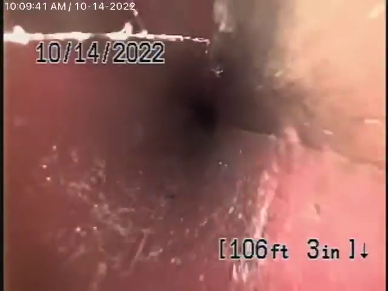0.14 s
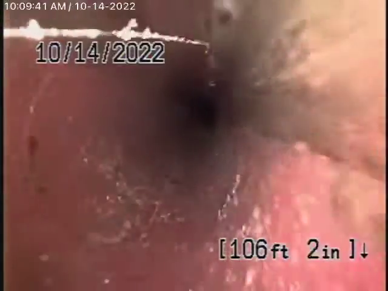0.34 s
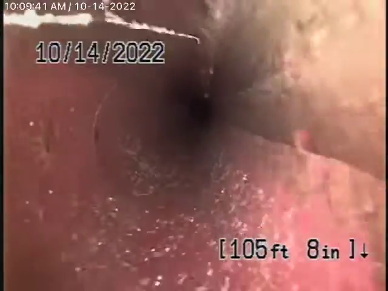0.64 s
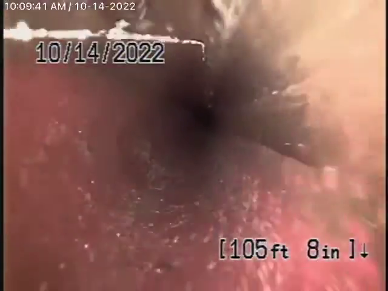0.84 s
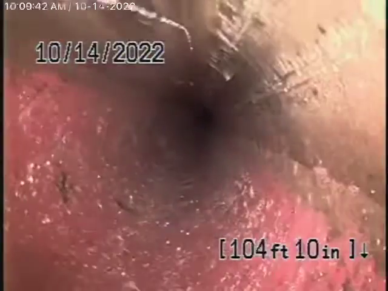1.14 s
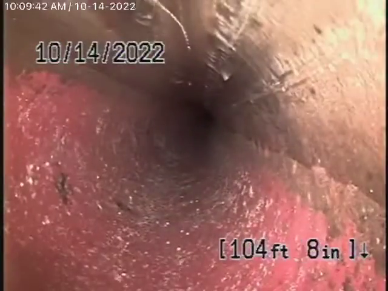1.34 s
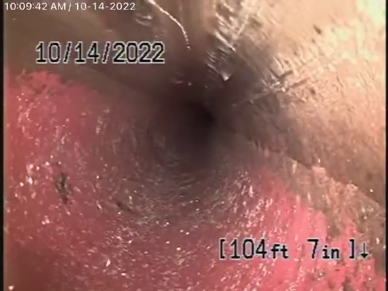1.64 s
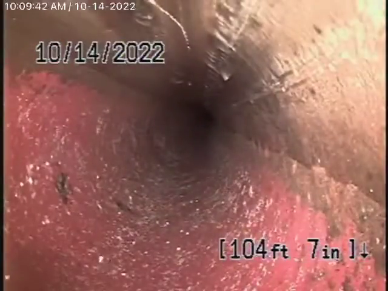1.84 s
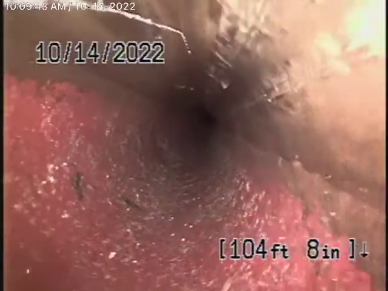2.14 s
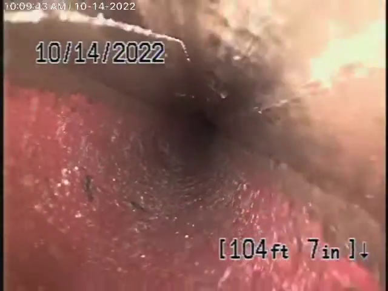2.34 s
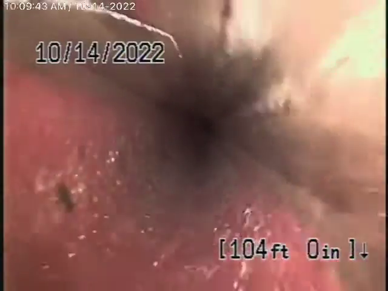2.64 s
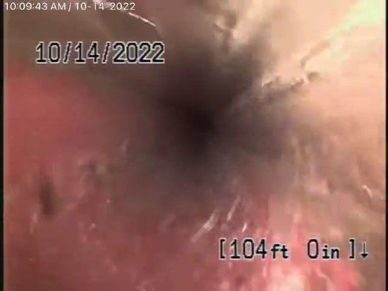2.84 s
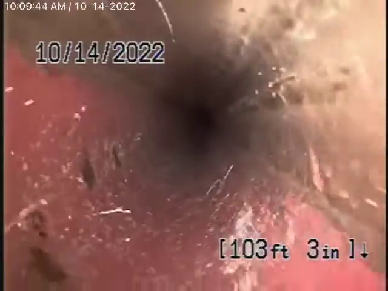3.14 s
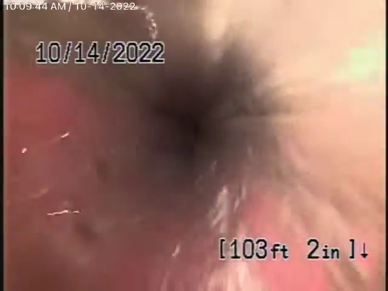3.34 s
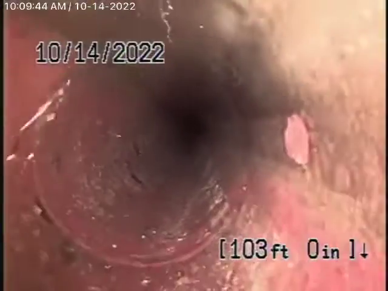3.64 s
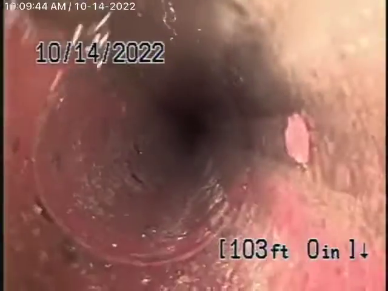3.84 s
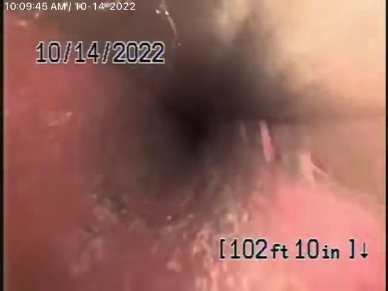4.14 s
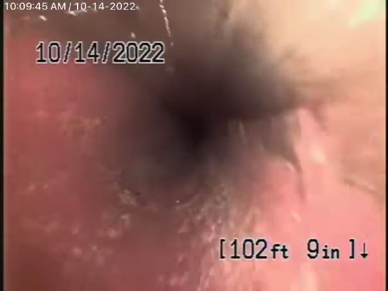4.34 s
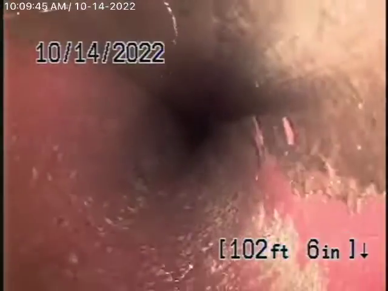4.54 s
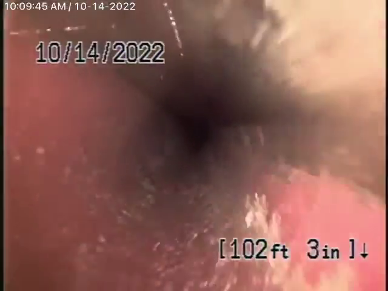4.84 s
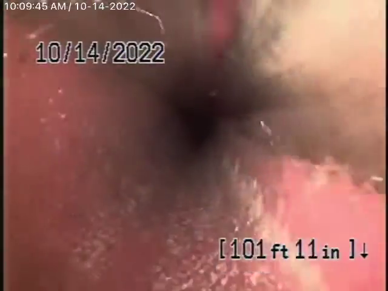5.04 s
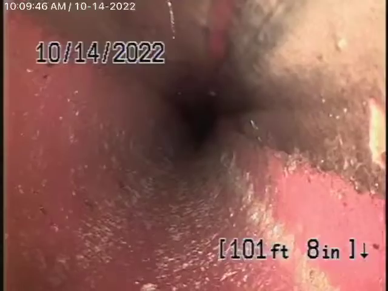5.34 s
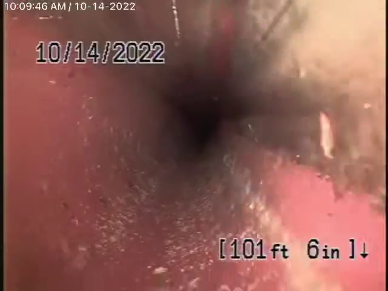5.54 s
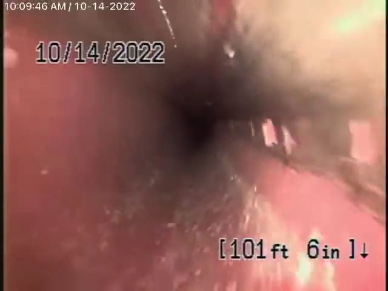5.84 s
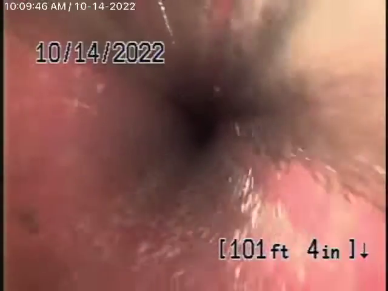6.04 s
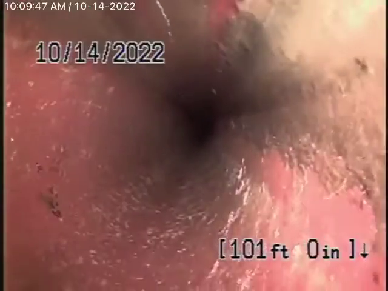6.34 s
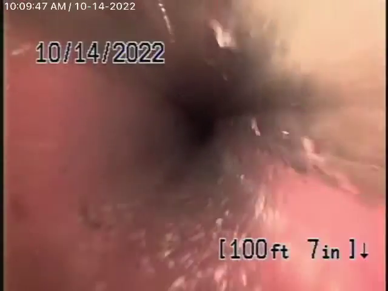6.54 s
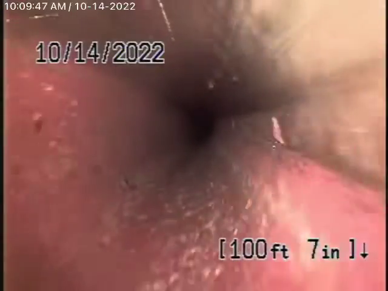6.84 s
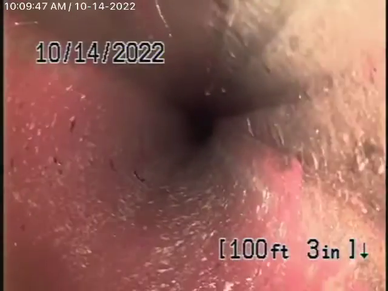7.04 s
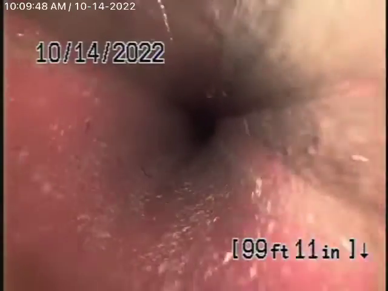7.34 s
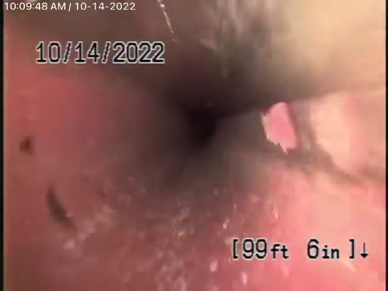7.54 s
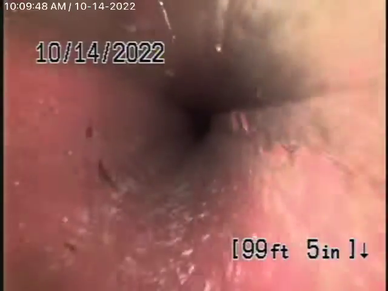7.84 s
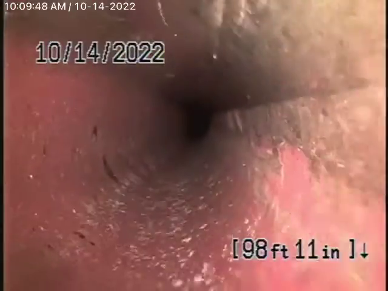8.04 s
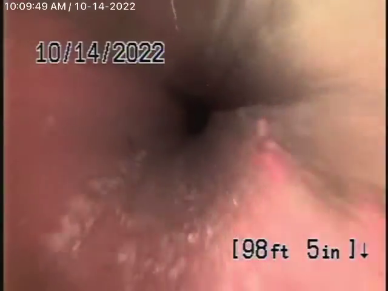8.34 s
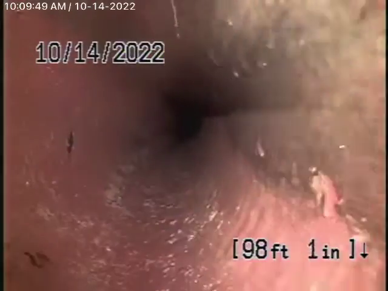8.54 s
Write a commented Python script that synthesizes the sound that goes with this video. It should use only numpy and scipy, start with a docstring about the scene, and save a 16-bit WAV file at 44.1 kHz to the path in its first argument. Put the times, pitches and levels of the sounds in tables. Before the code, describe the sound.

A stiff camera cable is pulled from a pipe and wound onto a steel reel in a small room, heard through a close, treble-limited microphone with faint hiss. A low wavering hum and dull rumble run throughout. Rubbing starts moderate, with dry clicks around 0.6 and a clank with ticks at 0.8 to 1 second, then eases from 1.3 to 2. It swells with a thin, fluttering whistle around 2.7 and again near 3.2. A strong metallic knock rings at 3.3, with lighter contacts near 3.9. A sharp tick at 4.7 precedes the loudest clank at 4.9. The rubbing dips around 5.5, a duller knock lands at 5.6, then the pull picks up near 6.3 with a crisp tick. Softer knocks follow at 6.6 and 7.4, dry ticks at 8, and rubbing continues to the end at about 8.7.

```python
"""Inspection cable wound onto its reel

The push cable of an inspection camera is pulled back out of a buried pipe and fed onto its reel.
The turning reel hums and rumbles as filtered noise and wavering low tones; the cable rubs, whistles
and crackles as bands of noise. Ticks in the guide and dry pops are short, fading rings.
Now and then a stiff coil slips and knocks against the steel cage, in a small room: fading sine tones
give the ring and bands of fading noise give the clatter.
"""
import sys
import numpy as np
from scipy import signal
from scipy.fft import rfft, irfft, next_fast_len
from scipy.io import wavfile

SR = 44100
rng = np.random.default_rng(int(sys.argv[2]) if len(sys.argv) > 2 else 0)


def int16_out(signal):
    """Quantize to a 16-bit WAV file."""
    q = np.round(np.clip(np.atleast_2d(signal).T, -1, 1) * 32767)
    wavfile.write(sys.argv[1], SR, q.astype(np.int16))


N = 382788
TIME = np.arange(N) / SR
AGE = TIME[:SR]  # time since a contact, up to one second

# Coil knocks against the cage: (time [s], force [dB], weight of the coil as bass boost [dB],
# hardness of the contact [dB per octave], pitch favoured by the spot struck [Hz],
# relative level of that pitch [dB])
KNOCKS = [(0.004, -39.5, -0.5, -6, 507, -34), (0.864, -27.5, 2.5, -0.4, 1624, -27),
          (3.14, -37.5, 1, -6.5, 340.6, -30.5), (3.146, -49, 9, 5.5, 149, -33.5),
          (3.333, -21.5, -2.5, -1.43, 782, -21), (3.372, -42.5, -13, 2.5, 1844, -24),
          (3.803, -57.5, 6, 4.5, 1400, -50), (3.877, -41.5, 3.5, -1.4, 1150, -43),
          (3.936, -49, 13.5, -0.5, 179, -36), (4.355, -59, 4, 3, 208.5, -34.5),
          (4.933, -35.5, -26, 4, 2970, -21), (4.938, -15.5, -10.5, -1.65, 547, -18.5),
          (4.985, -42.5, 12.5, -5, 134.5, -34.5), (5.286, -51.5, 4.5, -2.5, 496, -49),
          (5.619, -28.5, -14, -12, 1012, -32.5), (5.626, -38, 6, -0.6, 184.6, -35),
          (6.632, -41.5, -6.5, -5.5, 670, -47), (6.672, -37.5, -5, -4, 510, -38),
          (6.929, -55, 11, -8, 176, -36.5), (7.444, -30, -8.5, -5.5, 666, -22),
          (7.61, -63.5, 23.5, -15, 184, -42), (8.491, -56.5, 3, 1, 1430, -60)]

USUAL_PULL_DB = -54  # pull at which rolling and rumble have their usual levels


def from_db(db):
    """Turn decibels into a gain."""
    return 10 ** (np.asarray(db) / 20)


def rms_one(x):
    """Scale a sound to unit power."""
    return x / np.sqrt(np.mean(x ** 2) + 1e-20)


def at_hz(points, hz):
    """Read a spectrum between its points, on a log-frequency axis."""
    points = np.array(points)
    return np.interp(np.log(hz), np.log(points[:, 0]), points[:, 1])


def fade(age, t60):
    """Die away exponentially, losing 60 dB in t60 seconds."""
    return from_db(-60 * age / t60)


def add(out, start_s, sound):
    """Mix a sound in at its start time, cutting whatever runs past the end."""
    first = max(0, round(start_s * SR))
    out[first:first + len(sound)] += sound[:max(0, N - first)]


def band(x, low_hz, high_hz):
    """Keep only the pitches between two limits."""
    sos = signal.butter(2, [low_hz, high_hz], "band", fs=SR, output="sos")
    return signal.sosfilt(sos, x)


def drift(per_s):
    """Wander between random values, per_s of them each second, joined by straight lines."""
    return np.interp(TIME * per_s, np.arange(4096), rng.standard_normal(4096))


def noise(spectrum, peaks=()):
    """Make unit-power noise with a smooth spectrum and resonances standing out of it."""
    size = next_fast_len(N)
    hz = np.maximum(np.fft.rfftfreq(size, 1 / SR), 1)
    lift = 1  # in power
    for peak_hz, width_hz, db in peaks:
        lift = lift + (from_db(db) ** 2 - 1) / (1 + (2 * (hz - peak_hz) / width_hz) ** 2)
    gain = from_db(at_hz(spectrum, hz)) * np.sqrt(np.abs(lift))
    white = rng.standard_normal(size)
    return rms_one(irfft(rfft(white) * gain, size)[:N])


def hiss(level_db):
    """The microphone's steady hiss is noise with a fixed spectrum."""
    # Relative spectrum of the hiss: (pitch [Hz], level [dB per Hz])
    hiss_spectrum = [(100, -13.5), (500, 14), (1500, 9.5), (3500, -3), (7000, -22)]
    return from_db(level_db) * noise(hiss_spectrum)


def pull_effort():
    """The effort of the pull rises and falls along straight lines between set points."""
    # Effort, as the level of the rubbing before its own adjustments: (time [s], level [dB])
    effort_points = [(0, -52.5), (0.55, -53.5), (1.02, -50.5), (1.3, -58.4), (2.05, -57.5), (2.72, -48),
                     (2.92, -54), (3.22, -48), (3.62, -54.5), (4.1, -51), (4.55, -53.5), (4.8, -50.5),
                     (5.15, -52), (5.47, -58), (6.3, -51.0), (6.8, -55), (7.35, -52), (8.68, -55)]
    s, level_db = np.transpose(effort_points)
    return np.interp(TIME, s, level_db)


def rumble(pull_db, usual_db, follows):
    """A dull rumble takes a share of the pull's swing and wanders in level."""
    # Relative smooth spectrum: (pitch [Hz], level [dB per Hz])
    rumble_spectrum = [(20, -7), (33, -25), (48, 8.5), (80, -2), (100, -1.5), (140, -3.5), (250, -26.5),
                       (600, -59)]
    # Resonances that the motion keeps excited: (pitch [Hz], width [Hz], boost [dB])
    rumble_peaks = [(71.4, 6.6, 12), (114, 22, 15)]
    level_db = usual_db + follows * (pull_db - USUAL_PULL_DB)
    return from_db(level_db + 1.9 * drift(4.4)) * noise(rumble_spectrum, rumble_peaks)


def hum(centre_hz, centre_db):
    """The reel's hum is a low tone that wavers in pitch and level."""
    hz = centre_hz * (1 + 0.0892 * drift(4))
    phase = 2 * np.pi * np.cumsum(hz) / SR
    return from_db(centre_db + 3.7 * drift(9.0)) * np.sin(phase)


def low_swells(waver):
    """Brief low drones swell and die, each wavering by a small share of its pitch."""
    # Drones: (start [s], length [s], middle pitch [Hz], peak level [dB])
    swell_table = [(-.1, 0.65, 114.7, -47.5), (2.153, 0.59, 73, -55), (2.15, .55, 100.9, -54),
                   (2.497, 0.38, 119, -48), (2.7, 0.64, 101, -52), (3.9, 0.51, 82, -51.5),
                   (4.038, 0.54, 211, -52.5), (5.8, 0.3, 76, -51.5)]
    out = np.zeros(N)
    for start, length, hz, db in swell_table:
        progress = np.clip((TIME - start) / length, 0, 1)
        phase = 2 * np.pi * np.cumsum(hz * (1 + waver * drift(5))) / SR
        out += from_db(db) * np.sin(np.pi * progress) * np.sin(phase)
    return out


def grit(per_s, spread_db):
    """Specks of dirt on the cable crackle through the guide, at random moments and sizes."""
    sizes = from_db(spread_db * np.minimum(rng.exponential(1, N), 4))
    signs = rng.choice([-1, 1], N)
    clicks = sizes * signs * (rng.random(N) < per_s / SR)
    scatter = rng.standard_normal(len(AGE)) * fade(AGE, 0.07)
    return rms_one(band(signal.fftconvolve(clicks, scatter)[:N], 2300, 4000))


def turning_reel(pull_db):
    """The pull keeps the cage ringing faintly and the cable rubbing through its guide."""
    # Relative smooth spectra of rolling and rubbing: (pitch [Hz], level [dB per Hz])
    roll_spectrum = [(90, -3.5), (160, -2.5), (260, -11), (400, -10.5), (700, -14), (1100, -20.5),
                     (2000, -22), (4000, -52)]
    rub_spectrum = [(300, -4), (1000, 4.5), (2400, 5.5), (3500, 4), (3900, 3), (4600, 6), (5300, 6.5),
                    (6400, 5.5), (7000, -7.5)]
    # Resonances that the motion keeps excited: (pitch [Hz], width [Hz], boost [dB])
    roll_peaks = [(170, 19, 5.2), (202, 25.6, 13.6), (324.7, 28.6, 13.3), (515, 40, 5.2), (660, 18, 6.1),
                  (851, 110, 8.4)]
    rub_peaks = [(1373, 130, 7.4), (3140, 325, 8)]
    # Lurches of the reel: (time [s], change in rolling [dB], change in rubbing [dB])
    lurch_table = [(.35, 2.5, -3), (2.36, 1, 1), (3.87, 6.5, -0.5), (4.1, 2, 3), (4.8, 5.5, 1.5),
                   (5.3, 2.5, 3), (5.6, 8.5, 0.5), (5.94, 7.5, 3), (7.35, 2.5, 1), (7.62, 4.5, -3.5),
                   (8.35, -1, -3)]
    lurch_s = 0.071  # half length of a lurch

    # Rolling takes 0.48 of the pull's swing; rubbing takes all of it.
    roll_db = -52.5 + 0.48 * (pull_db - USUAL_PULL_DB)
    rub_db = pull_db - 2.14
    for s, roll_change_db, rub_change_db in lurch_table:
        lurch = np.exp(-((TIME - s) / lurch_s) ** 2)
        roll_db = roll_db + roll_change_db * lurch
        rub_db = rub_db + rub_change_db * lurch

    pressure = drift(25)  # the cable bears on the guide unevenly
    roll = from_db(roll_db + 1.35 * pressure) * noise(roll_spectrum, roll_peaks)
    crackle = from_db(-9.5) * grit(per_s=70, spread_db=3.5)
    rub = from_db(rub_db + 1.1 * pressure) * (noise(rub_spectrum, rub_peaks) + crackle)
    return roll + rub


def whistles(flutter_db):
    """Where the cable drags harder in its guide, friction sings in a narrow, fluttering band."""
    # Rough whistles: (start [s], end [s], pitch [Hz], width [Hz], level before flutter [dB])
    whistle_table = [(-.4, .7, 3120, 220, -75), (2.054, 3.1, 3170, 170, -63.5),
                     (2.107, 3.004, 6260, 340, -66.5), (3.749, 4.65, 3160, 190, -68),
                     (5.093, 7.901, 5200, 259, -69), (6.05, 6.546, 1420, 260, -66.5)]
    out = np.zeros(N)
    for start, end, hz, width, db in whistle_table:
        progress = np.clip((TIME - start) / (end - start), 0, 1)
        swell = np.sqrt(np.abs(np.sin(np.pi * progress)))
        tone = rms_one(band(rng.standard_normal(N), hz - width / 2, hz + width / 2))
        waver_s = 0.00031 * drift(18)  # uneven sliding speed bends the pitch
        tone = np.interp(TIME + waver_s, TIME, tone)
        out += from_db(db + flutter_db * drift(22)) * swell * tone
    return out


def pops(t60, octave_db):
    """Turns of cable slip past each other with a dry click and its weaker octave."""
    # Pops: (time [s], level [dB], pitch [Hz])
    pop_table = [(.562, -32, 1510), (.813, -30.5, 2880), (8.003, -38, 2070)]
    out = np.zeros(N)
    for s, db, hz in pop_table:
        phase = 2 * np.pi * hz * AGE
        tone = np.sin(phase) + from_db(octave_db) * np.sin(2 * phase)
        add(out, s, from_db(db) * fade(AGE, t60) * tone)
    return out


def guide_ticks(level_db, crack_db, ring_hz, ring_t60, spray_db, snap_t60, room_db, room_t60):
    """The cable ticks in its guide: a hard crack, then a short ring and a spray of reflections."""
    # Ticks: (time [s], relative ring level [dB], relative snap level [dB])
    tick_table = [(0.811, -38, -38), (0.966, -33, -36), (1.157, -46, -36), (2.33, -42, -58),
                  (2.531, -49, -33.5), (2.663, -41, -29.5), (3.851, -45, -51), (4.732, -29, -19),
                  (4.827, -37.5, -33), (5.128, -35, -37.5), (6.345, -30.5, -23.5), (8.003, -34, -30.5),
                  (8.045, -48, -39)]
    # Tones of the guide's crack: (pitch [Hz], relative level [dB], time to fade by 60 dB [s])
    crack_tones = [(3400, 9.5, 0.0064), (4530, 13, 0.0028), (5800, 12.5, 0.0028)]
    crack = np.zeros(len(AGE))
    for hz, db, t60 in crack_tones:
        crack += from_db(db + crack_db) * fade(AGE, t60) * np.sin(2 * np.pi * hz * AGE)
    crack *= 1 - np.exp(-AGE / 0.00033)  # very quick onset
    tail = from_db(room_db) * fade(AGE, room_t60)
    build = 1 - np.exp(-AGE / 0.0042)  # reflections gather after the direct sound

    out = np.zeros(N)
    for s, ring_db, snap_db in tick_table:
        white = rng.standard_normal((2, len(AGE)))
        ring = rms_one(band(white[0], ring_hz * 0.862, ring_hz * 1.088))
        ring = ring * (fade(AGE, ring_t60) + tail)
        spray = from_db(spray_db) * band(white[1], 2400, 8000) * (fade(AGE, snap_t60) + tail)
        snap = crack + build * spray
        add(out, s, from_db(ring_db) * build * ring + from_db(snap_db) * snap)
    return from_db(level_db) * out


def arrival(hz, lag_1khz, swell_cycles):
    """Bending waves are slower at low pitch: the lows arrive late and swell over a few cycles."""
    age = np.maximum(AGE - lag_1khz * np.sqrt(1000 / hz), 0)
    return age, 1 - np.exp(-age * hz / swell_cycles)


def strengths(hz):
    """Find how hard each knock drives the cage at one pitch."""
    force_db, weight_db, hardness = np.transpose(KNOCKS)[1:4]
    bass = 1 / (1 + np.square(hz / 460) ** 2)  # a heavy coil adds bass below 460 Hz
    octaves = max(0, np.log2(hz / 460))  # a hard contact tilts the spectrum above 460 Hz
    jacket_db = -5.5 * max(0, np.log2(hz / 1920))  # the soft jacket dulls each octave above 1920 Hz
    return from_db(force_db + weight_db * bass + hardness * octaves + jacket_db)


def chatter(depth_db, per_s):
    """Loose coils keep touching the cage, so its clatter dies away unevenly."""
    return from_db(depth_db * drift(per_s))


def cage_clatter(level_db, lag_1khz, swell_cycles, t60_1khz, damping, crack_db, crack_t60,
                 room_db, room_t60, room_damping):
    """Dense modes give a crack and a crash, briefer in the treble, and then the room's tail."""
    # The cage's dense, short-lived modes: (pitch [Hz], relative level [dB per band])
    clatter_spectrum = [(100, -13), (270, -9), (400, -10), (520, -2), (950, -8.5), (1500, -1), (2300, -4),
                        (3300, 3), (4100, -6), (5300, -1), (7000, -14)]
    out = np.zeros(N)
    edges = np.geomspace(90, 7600, 24)
    white = rng.standard_normal((2, N))  # neighbouring bands use different noise
    for k, (low, high) in enumerate(zip(edges, edges[1:])):
        hz = np.sqrt(low * high)
        khz = hz / 1000
        age, swell = arrival(hz, lag_1khz, swell_cycles)
        crack = from_db(crack_db) * fade(age, crack_t60)
        crash = fade(age, t60_1khz / khz ** damping)
        tail = from_db(room_db) * fade(age, room_t60 / khz ** room_damping)
        shape = swell ** 2 * (crack ** 2 + crash ** 2 + tail ** 2)
        power = np.zeros(N)  # the powers of overlapping knocks add up
        for knock, gain in zip(KNOCKS, strengths(hz)):
            add(power, knock[0], gain ** 2 * shape)
        grain = rms_one(band(white[k % 2], low, high))
        out += from_db(at_hz(clatter_spectrum, hz)) * np.sqrt(power) * grain
    return from_db(level_db) * out


def struck_spot(level_db, t60_1khz, damping, lag_1khz, swell_cycles):
    """One mode stands out in each knock, set by where the coil lands."""
    out = np.zeros(N)
    for s, *_, hz, db in KNOCKS:
        age, swell = arrival(hz, lag_1khz, swell_cycles)
        khz = hz / 1000
        ring = swell * fade(age, t60_1khz / khz ** damping) * np.sin(2 * np.pi * hz * age)
        add(out, s, from_db(db) * ring)
    return from_db(level_db) * out


def cage_ring(level_db, scatter_db, lag_1khz, swell_cycles):
    """Every knock rings all the cage's modes; chance varies their strengths, as the spot struck would."""
    # Modes of the reel cage: (pitch [Hz], relative level [dB], time to fade by 60 dB [s])
    cage_modes = [(114.1, -6, 0.41), (152.7, -5, .28), (198.9, 7.5, 0.18), (332, -1.5, 0.26),
                  (517.3, 1, 0.12), (556, -7.5, 0.17), (676, -6.5, 0.22), (770, -7.5, 0.11),
                  (787, -9.5, 0.1), (1001, -9.5, 0.12), (1349, -5.5, 0.12), (1387, -20, 0.092),
                  (1516, -23, .19), (1678, -5.5, 0.092), (1824, -11, 0.33), (2105, -20.5, 0.24),
                  (2470, -15, 0.23), (2803, -7.5, 0.16), (3120, -7, 0.4), (3430, -3.5, 0.088)]
    out = np.zeros(N)
    for hz, db, t60 in cage_modes:
        age, swell = arrival(hz, lag_1khz, swell_cycles)
        ring = swell * fade(age, t60) * np.sin(2 * np.pi * hz * age)
        mode_db = db + scatter_db * rng.standard_normal(len(KNOCKS))
        gains = strengths(hz) * from_db(mode_db)
        for knock, gain in zip(KNOCKS, gains):
            add(out, knock[0], gain * ring)
    return from_db(level_db) * out


def scene():
    """Mix the moving reel, the ticks and pops and the knocks over the microphone's hiss."""
    # Names ending in t60 and lag_1khz are in seconds.
    pull_db = pull_effort()
    drone = rumble(pull_db, usual_db=-56.5, follows=0.41)
    drone += hum(centre_hz=49.8, centre_db=-59.5) + low_swells(waver=0.012)
    sliding = turning_reel(pull_db) + whistles(flutter_db=6.0)
    contacts = pops(t60=0.009, octave_db=-8)
    contacts += guide_ticks(level_db=-2, crack_db=-5.5, ring_hz=3125, ring_t60=0.031,
                            spray_db=0, snap_t60=0.055, room_db=-12.5, room_t60=0.29)
    clatter = cage_clatter(level_db=-2.0, lag_1khz=0.00025, swell_cycles=1.3,
                           t60_1khz=0.11, damping=0.14, crack_db=0.0, crack_t60=0.012,
                           room_db=-10, room_t60=0.42, room_damping=0.1)
    knocks = clatter * chatter(depth_db=0.95, per_s=280)
    knocks += struck_spot(level_db=-3.0, t60_1khz=0.096, damping=0.66,
                          lag_1khz=0.0011, swell_cycles=1.5)
    knocks += cage_ring(level_db=-2.0, scatter_db=2.0, lag_1khz=0.002036, swell_cycles=1.5)
    return (hiss(level_db=-61) + drone + sliding + contacts + knocks)[None]


def record(dry):
    """A narrow-band recorder cuts the treble steeply above 6950 Hz."""
    # order 12, 0.2 dB ripple below the cut and 70 dB less above it
    sos = signal.ellip(12, 0.2, 70, 6950, fs=SR, output="sos")
    return signal.sosfilt(sos, dry)


dry = scene()
out = record(dry)
int16_out(out)
```